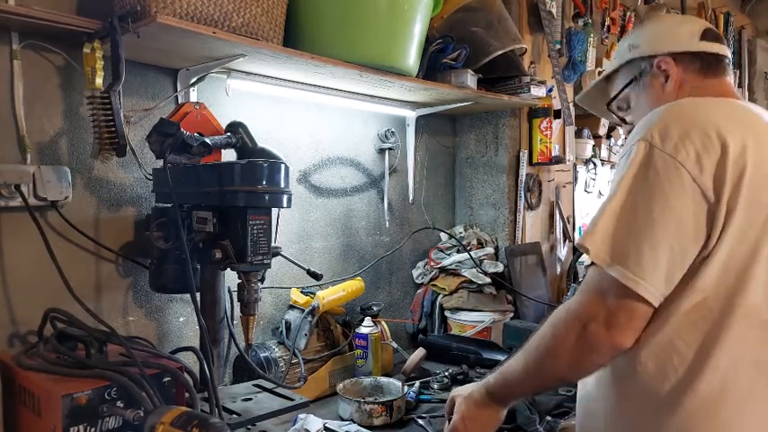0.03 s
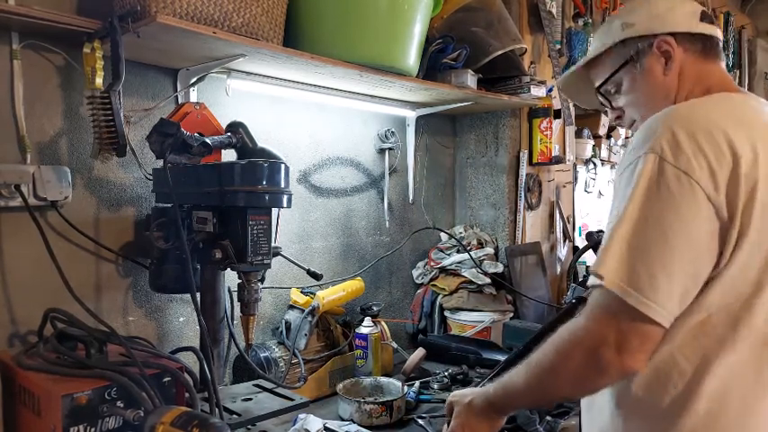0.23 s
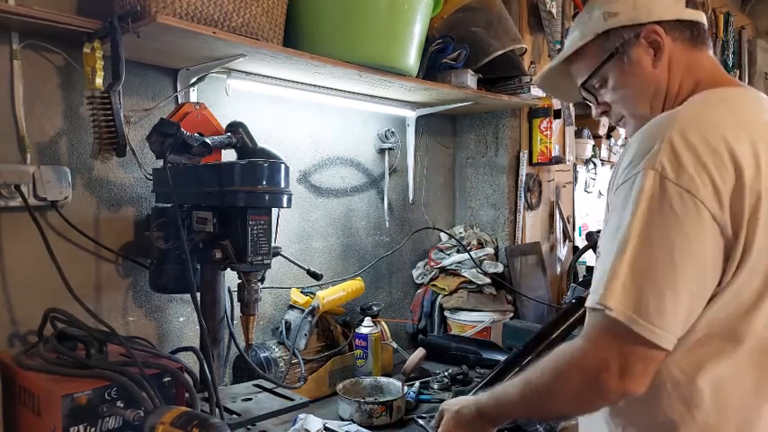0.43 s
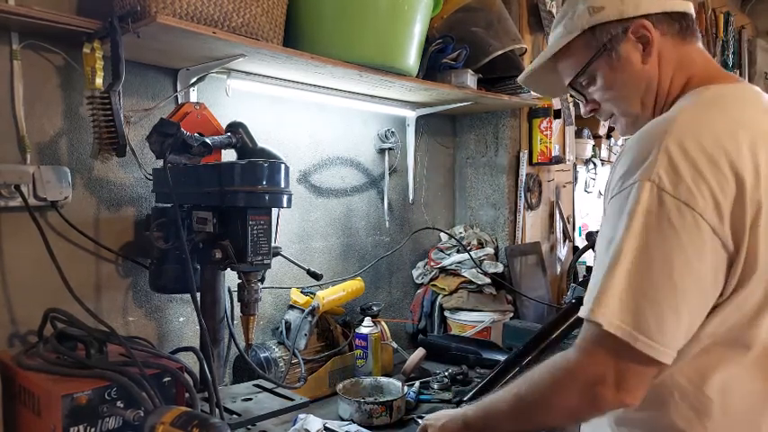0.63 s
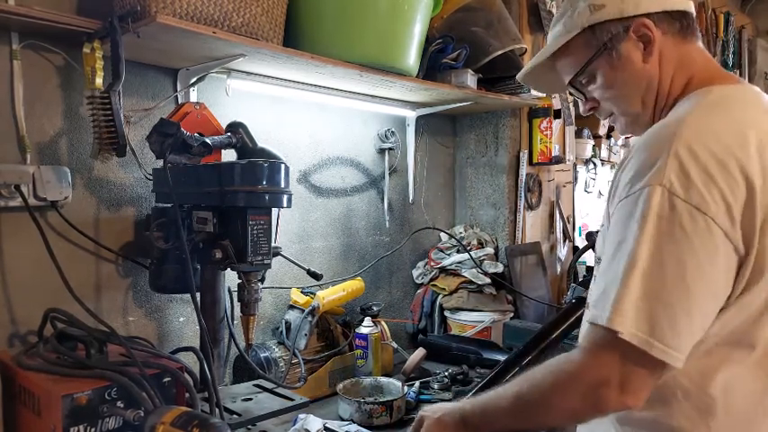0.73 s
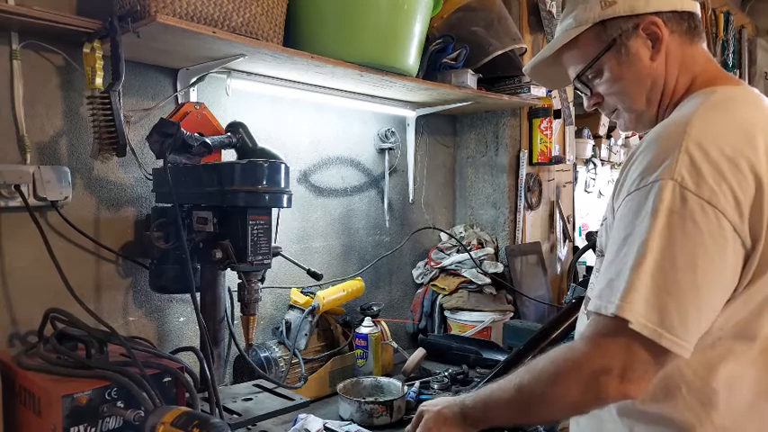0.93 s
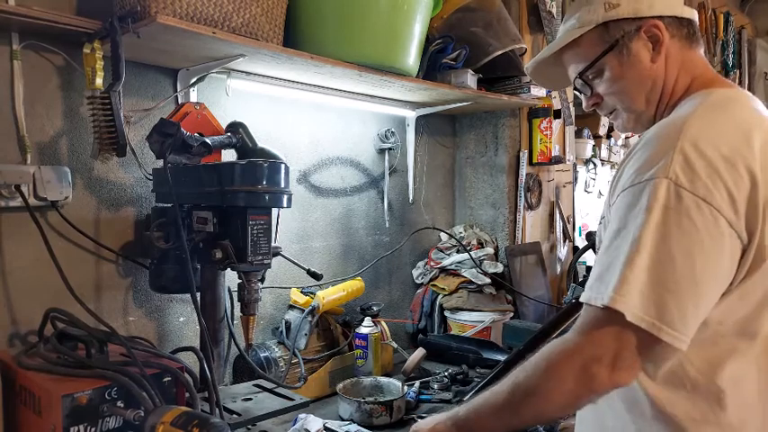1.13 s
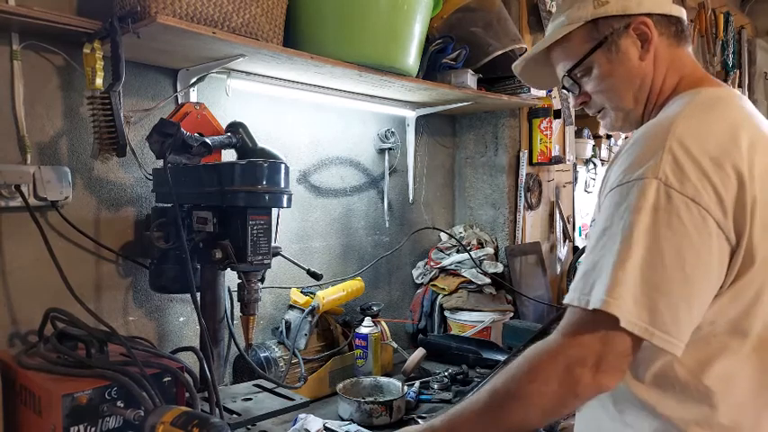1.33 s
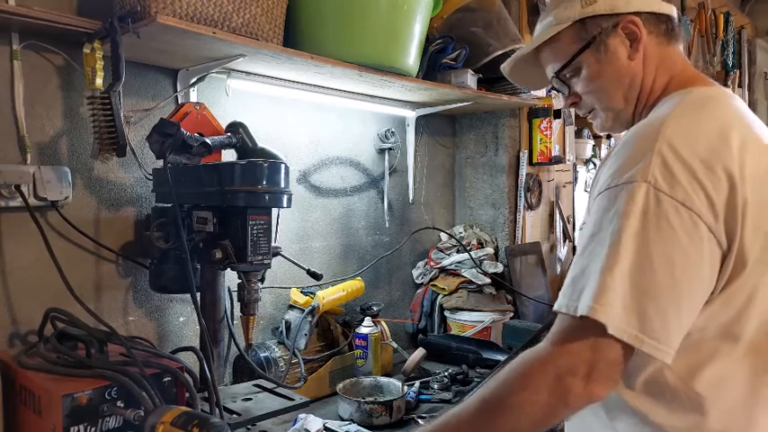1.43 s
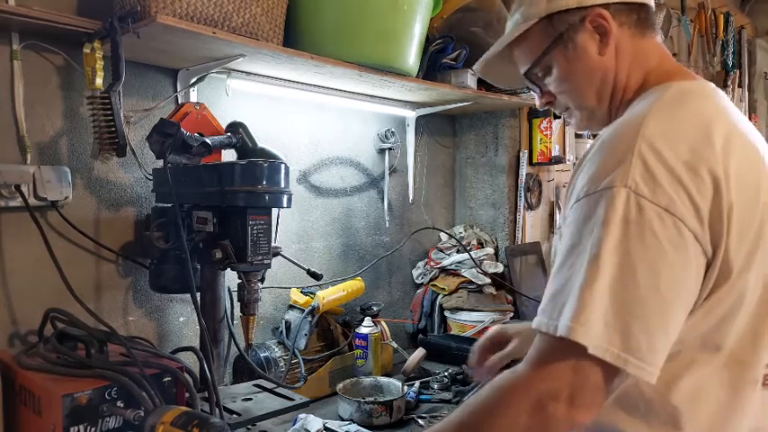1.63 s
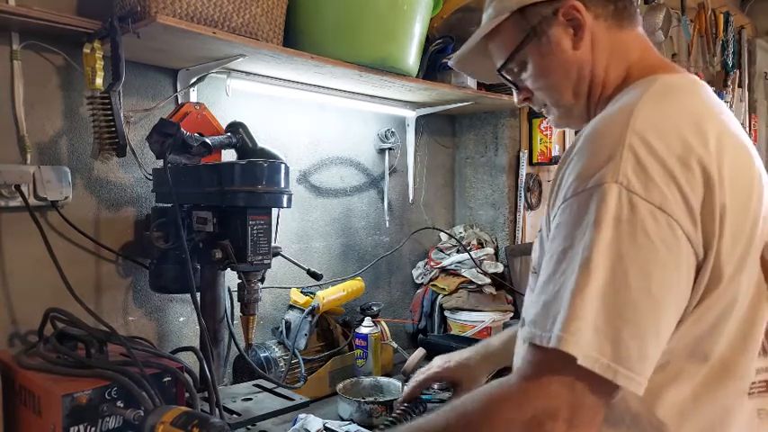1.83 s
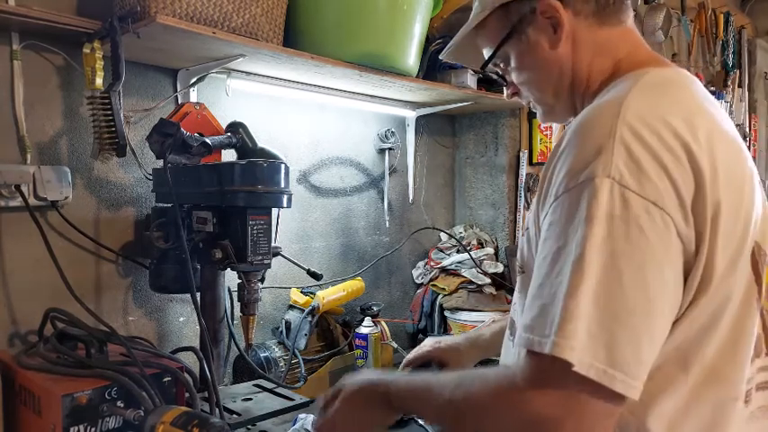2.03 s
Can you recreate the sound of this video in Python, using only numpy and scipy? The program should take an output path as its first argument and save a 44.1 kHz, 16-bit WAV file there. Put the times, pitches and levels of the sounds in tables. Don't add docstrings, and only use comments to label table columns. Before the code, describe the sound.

One hard woody knock with a tight rattle of bounces, faint settling ticks, then a brighter burst of metallic scraping and clinking and a quick run of clicks, heard close in a small, quiet garage.

```python
import sys
import numpy as np
from scipy import signal
from scipy.fft import rfft, irfft
from scipy.io import wavfile
from scipy.ndimage import uniform_filter1d

SR = 44100
rng = np.random.default_rng(int(sys.argv[2]) if len(sys.argv) > 2 else 0)


def gain_from_db(level_db):
    decades = np.asarray(level_db, float) / 20
    return 10 ** decades


def put_to_file(sound):
    columns = np.atleast_2d(sound).T
    safe = np.clip(columns, -1, 1)
    whole_steps = np.round(safe * 32767)
    wavfile.write(sys.argv[1], SR, whole_steps.astype(np.int16))


N = 92610

# t/s, level/dB
STROKES = [
    [(.085, -72), (.1, -60.5), (.15, -51.5), (.19, -50.5)],
    [(.25, -42), (.322, -51), (.345, -49), (.4, -53), (.565, -59.5)],
    [(.571, -51), (.635, -54.5), (.68, -57.5)],
    [(.735, -72), (.78, -59), (.83, -78.5), (.93, -80.5)],
    [(.95, -78.5), (1.07, -67), (1.12, -54.5)],
    [(1.124, -50), (1.165, -40.5), (1.2, -41.5), (1.24, -40.5), (1.305, -39.5), (1.345, -53.5)],
    [(1.422, -44), (1.453, -39.5), (1.48, -53)],
]
# f/Hz, level/dB, t60/s
BOX = [(497.2, -4, 0.069), (610, -2.5, .02), (379.8, -11.5, .02), (882, -7, 0.014)]
# f/Hz, level/dB, t60/s
BOLTS = [(379, -1.5, 0.019), (534.7, -7, 0.048), (927, -12, 0.03), (1120, -6.5, 0.02), (1255, -2.5, 0.016),
         (2783, -10.5, 0.071), (4640, -8, 0.17)]
# f/Hz, level/dB, t60/s
CLIP_PART = [(507, -40, 0.033), (1225, -3, 0.068), (1966, -8.5, 0.019), (3010, -9.5, 0.041),
             (4643, -1, 0.16), (14500, -10, 0.0049), (11130, -11, 0.042)]
# f/Hz, level/dB, t60/s
CARTON = [(430, -3.5, 0.03), (775, -4.5, 0.025), (1220, 3, 0.011), (2320, -2.5, 0.065),
          (5050, -19.5, 0.025)]
# f/Hz, level/dB, t60/s
SLIDER = [(394, -15.5, 0.092), (471, -8.5, 0.092), (1110, -5.5, 0.11), (1197, -6, 0.096), (2061, -9, 0.04),
          (4546, -7.5, 0.1), (4670, -7.5, 0.32), (4900, -3, 0.061), (5080, -6, 0.035), (10130, -13, 0.24),
          (10850, -12, 0.11), (12300, -26, 0.046)]
# f/Hz, level/dB, t60/s
SOCKET = [(255.4, -15.5, 0.073), (615, -18.5, 0.056), (1144, -9, 0.052), (4640, -8, 0.078), (4557, -2, .25),
          (4553, -9.5, 0.042), (4800, -5.5, 0.038), (5120, -9, 0.024), (10130, -1.5, 0.042),
          (10830, -4, 0.041)]
# f/Hz, level/dB, t60/s
PARTS = [BOX, BOLTS, CLIP_PART, CARTON, [(1074, -10.5, 0.069), (2320, -7, 0.086)], SLIDER, SOCKET]
# f/Hz, level/dB per Hz
GRIT = [(120, -49), (200, -12), (473, 0.5), (1120, -10), (1480, -2.5), (4680, -12), (9060, -20.5),
        (11100, -16), (16000, -30)]


def evened(x):
    return x / np.sqrt(np.mean(x ** 2) + 1e-20)


def read(points, hz):
    f, value = np.transpose(points)
    return np.interp(np.log(hz + 1), np.log(f + 1), value)


def add(mix, s, sound):
    part = mix[:, round(s * SR):][:, :sound.shape[1]]
    part += sound[:, :part.shape[1]]


def ring(modes, focus_hz=0):
    split, rise_cycles, focus_oct = 0.0087, 1.5, 0.13
    hz, db, t60 = np.transpose(modes).repeat(3, axis=1)[:, :, None]
    detune, lean = rng.uniform(-0.77, 1, (len(hz), 2)).T[:, :, None]
    size = np.sqrt((gain_from_db(db) ** 2).sum())
    if focus_hz:
        db = db - 9 * np.minimum((np.log2(hz / focus_hz) / focus_oct) ** 2, 3)
    hz = hz * (1 + split * detune * .1 / t60)
    t = np.arange(SR // 3) / SR
    turn = lean * np.minimum(hz / 700, 3.2)
    decay = gain_from_db(db - 60 * t / t60) / np.sqrt(t60 * SR / 28)
    shape = decay * np.minimum(t * hz / rise_cycles, 1)
    ports = [(shape * np.sin(2 * np.pi * hz * t + side * turn)).sum(0) for side in (-.5, .5)]
    return np.array(ports) / size


def colour(points, tilt_db=0, focus_hz=0):
    puff_oct, scatter_db, scatter_s = 0.77, 6, 0.0014
    hz = abs(np.fft.fftfreq(4096, 1 / SR))
    db = read(points, hz) + tilt_db * np.log2((hz + 100) / 3000)
    if focus_hz:
        db = -4.3 * (np.log2((hz + 20) / focus_hz) / puff_oct) ** 2
    log = np.log(gain_from_db(np.maximum(db, -100)))
    taps = np.fft.ifft(np.exp(log - 1j * signal.hilbert(log).imag)).real[:2048]
    paths = rng.standard_normal((2, 600))
    paths = (paths - uniform_filter1d(paths, size=41)) * np.exp(-np.arange(600) / (scatter_s * SR))
    direct = np.arange(600) == 0
    paths = gain_from_db(scatter_db) * paths / np.linalg.norm(paths[0]) + direct
    turns = rfft(paths, 2048, axis=1)
    paths = irfft(turns / abs(turns), axis=1)
    paths = np.roll(paths, 64, axis=1)[:, :1024]
    return signal.fftconvolve(taps[None], paths, axes=1)[:, 64:] / np.linalg.norm(taps)


def catches(count):
    catches_per_s, spread_db = 6500, 2
    height, sign, chance = rng.random((count, 3)).T
    size = gain_from_db(-spread_db * np.log(1 - .995 * height)) * np.sign(sign - .5)
    size = size * (chance < catches_per_s / SR)
    return evened(size + 1e-6)[None]


def strike(drive, modes, ring_db, grit_db, points, tilt_db=0, focus_hz=0):
    rung = gain_from_db(ring_db) * signal.fftconvolve(drive, ring(modes, focus_hz), axes=1)
    grit = signal.fftconvolve(drive, colour(points, tilt_db, focus_hz), axes=1)
    add(rung, 0, gain_from_db(grit_db) * grit)
    return rung


def air():
    level_db, patch_db = -64.5, 1.2
    # f/Hz, level/dB per Hz
    air_spectrum = [(15, -41.5), (25, -7), (145, -8), (354, -21), (384, -23), (1400, -32), (6050, -43.5),
                    (11000, -29), (16000, -46)]
    # f/Hz, left over right/dB
    air_left = [(60, 14), (380, 7), (2380, 1), (15000, -1.5)]
    frames, hz = N // 256 + 5, np.fft.rfftfreq(1024, 1 / SR)
    a, b, c, d, patches = rng.standard_normal((frames, 513, 5)).T
    left, other = a + 1j * b, c + 1j * d
    lean = read(air_left, hz)[:, None] / 2
    patches = evened(uniform_filter1d(uniform_filter1d(patches, 12, 0), 14, 1))
    same = np.clip(.7 - hz / 900, 0, 1)[:, None]
    right = same * left + np.sqrt(1 - same ** 2) * other
    z = np.array([left * gain_from_db(lean), right * gain_from_db(-lean)])
    z *= gain_from_db(read(air_spectrum, hz)[:, None] + patch_db * patches)
    return gain_from_db(level_db) * evened(signal.istft(z, nperseg=1024, noverlap=768)[1][:, :N])


def garage(x):
    # f/Hz, t60/s
    echo_decay = [(120, 0.41), (400, 0.35), (1000, .28), (3000, 0.24), (8000, 0.24), (15000, .15)]
    taps = np.zeros((2, SR // 2 + 40))
    at = np.arange(120, SR // 2, 20)
    at = at + rng.integers(0, 20, (2, len(at)))
    np.put_along_axis(taps, at, rng.choice([-1., 1.], at.shape), 1)
    hz, t, z = signal.stft(taps, SR, nperseg=256)
    shared = np.clip(1.2 - hz / 1400, 0, 1)[:, None]
    z[1] = shared * z[0] + np.sqrt(1 - shared ** 2) * z[1]
    fade = gain_from_db(-60 * t / read(echo_decay, hz)[:, None])
    tail = signal.istft(z * fade, SR, nperseg=256)[1]
    return signal.fftconvolve(x, tail / np.linalg.norm(tail[0]), axes=1)[:, :N]


def stroke(curve, modes, ring_db, grit_db, tilt_db, left_db):
    release_s = .006
    s, db = np.transpose(curve)
    t = np.arange(s[0], s[-1] + 4 * release_s, 1 / SR)
    press = gain_from_db(np.interp(t, s, db)) * np.exp(-np.maximum(t - s[-1], 0) / release_s)
    force = press * catches(SR // 2)[:, :len(t)]
    balance = gain_from_db([[left_db / 2], [-left_db / 2]])
    return s[0], balance * strike(force, modes, ring_db, grit_db, GRIT, tilt_db)


def clink(s, grit_db, ring_db, focus_hz, length):
    begun = sum(c[0][0] < s + .004 for c in STROKES)
    modes = PARTS[begun - 1]
    u = np.arange(3000) / SR / length
    burst = np.minimum(u / 0.086, 1) * np.exp(-u) * rng.standard_normal((1, len(u)))
    return s, strike(burst / np.linalg.norm(burst), modes, ring_db, grit_db, GRIT, focus_hz=focus_hz)


def knock():
    bench_db, crack_db, bar_db = -3.5, 4.5, -20
    slip_s, slip_db = .252, -39.5
    # f/Hz, level/dB, t60/s
    bench = [(158, -5, 0.26), (315.7, -10, 0.12), (479, -9.5, 0.22), (649, -8, 0.19), (847, -5.5, 0.18),
             (970.6, 4.5, 0.058), (1110, 1, 0.035), (1230, -2, 0.033), (1349, -11, 0.0385),
             (1610, -1, 0.025), (1770, -1.5, 0.045), (2080, -8.5, 0.0504), (2350, -16, .03),
             (2627, -10.5, 0.0397)]
    # f/Hz, level/dB, t60/s
    bar = [(2805, -14, 0.094), (5352, -10.5, 0.16), (5490, -19.5, 0.061), (8043, -4, 0.15)]
    # f/Hz, level/dB per Hz
    crack = [(60, -35.5), (150, -15), (500, -11), (1100, 2), (2200, -9), (3400, -23.5), (6000, -29.5),
             (10000, -20), (13000, -44.5)]
    # t/s, level/dB
    blows = [
        (0.2082, -12),
        (0.2111, -6),
        (0.2135, -4),
        (0.2167, -0.5),
        (0.2198, -10),
        (0.2261, -4.5),
    ]
    # t/s, level/dB
    buzz = [(.21, -49), (.225, -49), (.262, -53.5), (.3, -69.5)]
    force, out = np.zeros((1, 2000)), np.zeros((2, N))
    start = blows[0][0]
    for s, db in blows:
        push = 0.18 + rng.standard_normal((1, 200))
        add(force, s - start, gain_from_db(db) * np.exp(-np.arange(200) / 45) * push / 4.01)
    add(out, start, strike(force, bench, bench_db, crack_db, crack))
    add(out, start, gain_from_db(bar_db) * signal.fftconvolve(force, ring(bar), axes=1))
    add(out, *stroke(buzz, bar, ring_db=-18.5, grit_db=0, tilt_db=5.5, left_db=0))
    slip = catches(3000) * np.hanning(3000) ** 2
    add(out, slip_s - 1500 / SR, gain_from_db(slip_db) * signal.fftconvolve(slip, ring(bar[1:3]), axes=1))
    return out


def scene():
    wet_db, turns_per_s = -2, 9
    # ring/dB, grit/dB, brightness/dB per octave, left over right/dB
    mixes = [(-10.5, -13, -2, 1), (-5.5, -5, 0.6, 1), (-5.5, -3, 0, 2), (-1, 1.5, 0, 3.5),
             (-8.5, -3, 2.8, 2), (-3.5, 0.5, 3, -0.4), (-5.5, -3.5, 2.5, 2)]
    # t/s, grit/dB, ring/dB, pitch region f/Hz, length/s
    clinks = [(0.132, -37.5, -72, 10600, .006), (0.145, -25.5, -17, 514.6, 0.0065),
              (0.321, -26, -41, 4500, 0.002), (0.413, -33, -18, 4660, 0.025),
              (0.569, -29.5, -12, 4640, 0.004), (.622, -39.5, -20, 4640, 0.005),
              (0.7516, -24.5, -45, 533, 0.004), (0.774, -46.5, -10.5, 5050, 0.0071),
              (1.1244, -30.5, -26, 5000, .002), (1.126, -28, -14, 4900, 0.005),
              (1.1326, -28, -17, 8000, 0.0024), (1.176, -22, -7, 1150, 0.013),
              (1.1877, -2, -47.5, 12500, 0.011), (1.188, -9.5, -40, 5000, .012),
              (1.213, -30.5, -5.5, 476, .015), (1.249, -27.5, -17, 1110, 0.022),
              (1.254, -31, 1.5, 10850, 0.014), (1.284, -22.5, -4.5, 5106, .018),
              (1.334, -34.5, -7.5, 10130, .01), (1.4224, -21, -17, 10500, 0.0015),
              (1.425, -24.5, -17.5, 4800, .001), (1.432, -27.5, -16, 4800, .001),
              (1.4372, -28.5, -17.5, 4800, 0.00059), (1.445, -26, -18.5, 4800, .001),
              (1.447, -37, -12, 4660, .001), (1.4499, -25.5, -11, 4660, .001),
              (1.4539, -33, -24, 4660, .001), (1.4592, -30, -15, 4660, .001),
              (1.448, -34.5, -14.5, 1150, .012)]
    parts = knock()
    for curve, modes, mix in zip(STROKES, PARTS, mixes):
        add(parts, *stroke(curve, modes, *mix))
    for row in clinks:
        add(parts, *clink(*row))
    turn = 2 * np.pi * turns_per_s * np.arange(N) / SR
    echo = garage(parts * np.cos(turn)) + garage(parts * np.sin(turn))
    return parts + gain_from_db(wet_db) * echo + air()


def band_limit(x):
    return signal.sosfilt(signal.butter(12, 16520, fs=SR, output="sos"), x)


def record(dry):
    low_hz, top_hz = 40, 15850
    notch_hz, notch_width_hz, notch_db = 9100, 260, -8
    hz = np.fft.rfftfreq(N, 1 / SR) + 1
    dip = gain_from_db(notch_db * np.exp(-((hz - notch_hz) / notch_width_hz) ** 2))
    low_cut = 1 + (low_hz / hz) ** 8
    high_cut = 1 + np.exp((hz - top_hz) / 60)
    mix = irfft(rfft(dry, axis=1) * dip / low_cut / high_cut, N, axis=1)
    return band_limit(mix)


dry = scene()
out = record(dry)
put_to_file(out)
```